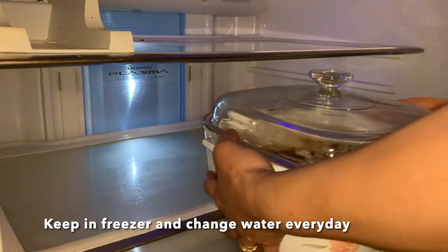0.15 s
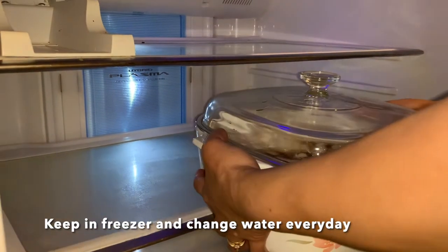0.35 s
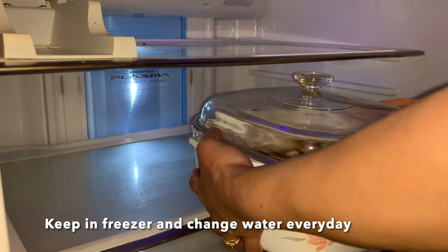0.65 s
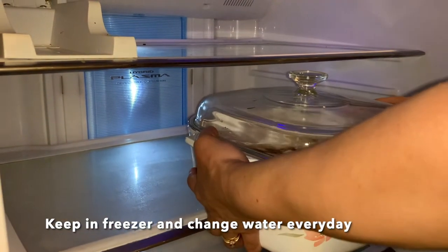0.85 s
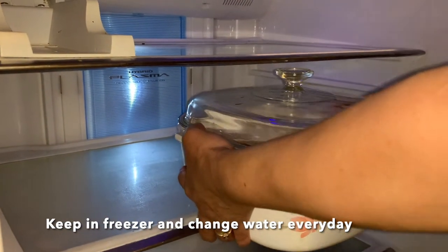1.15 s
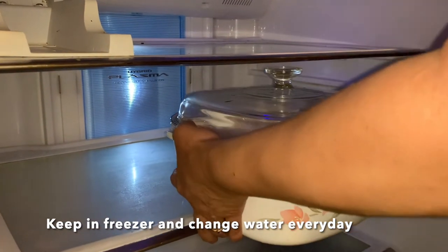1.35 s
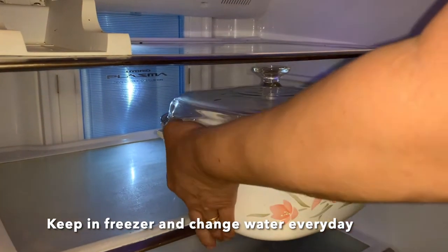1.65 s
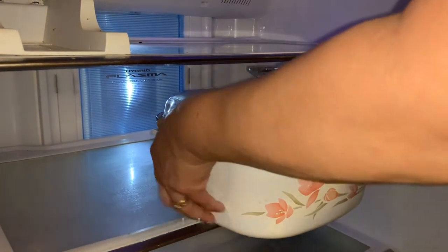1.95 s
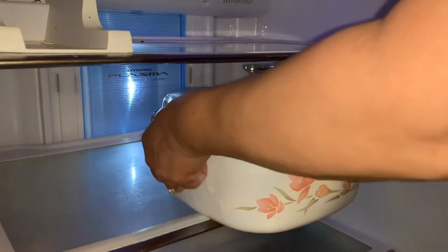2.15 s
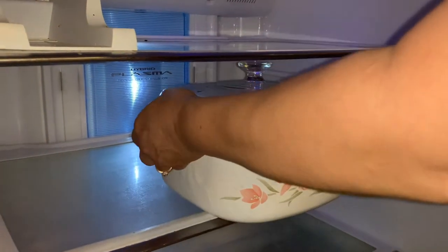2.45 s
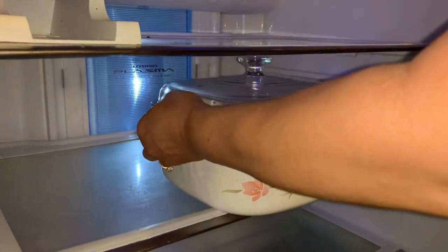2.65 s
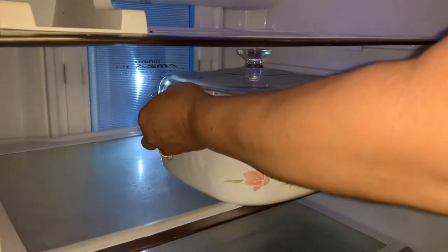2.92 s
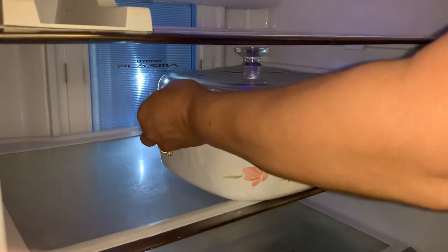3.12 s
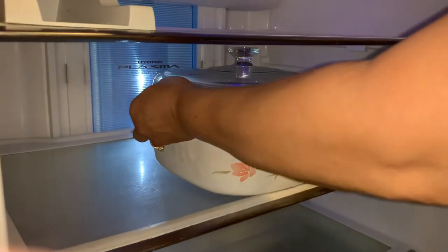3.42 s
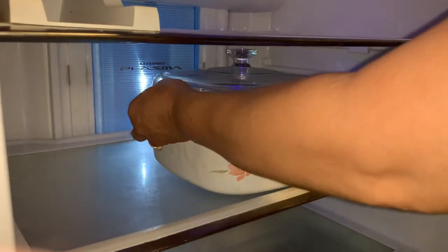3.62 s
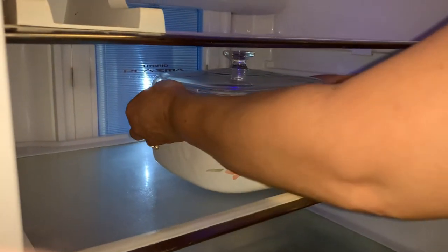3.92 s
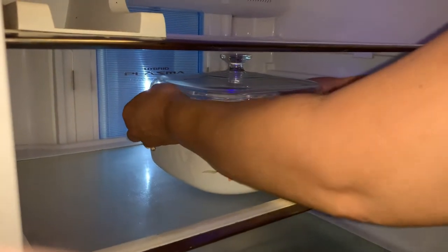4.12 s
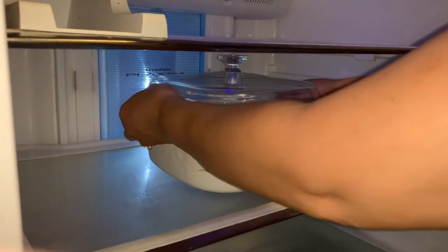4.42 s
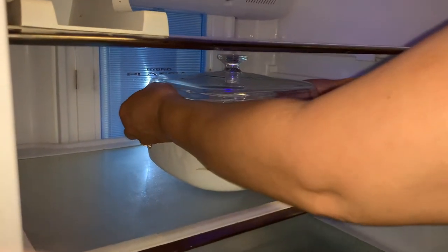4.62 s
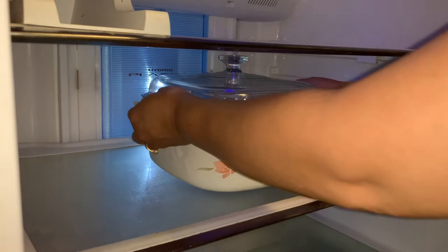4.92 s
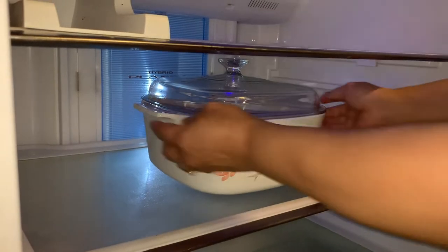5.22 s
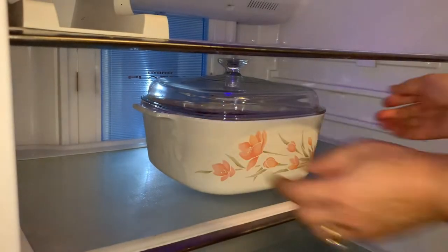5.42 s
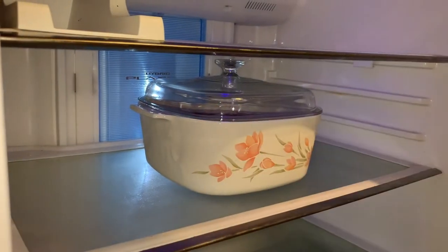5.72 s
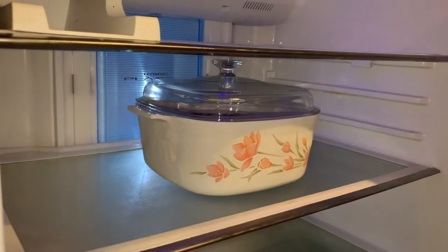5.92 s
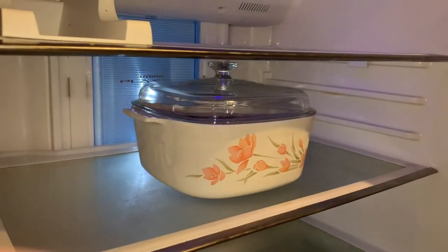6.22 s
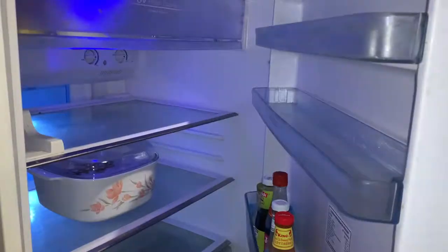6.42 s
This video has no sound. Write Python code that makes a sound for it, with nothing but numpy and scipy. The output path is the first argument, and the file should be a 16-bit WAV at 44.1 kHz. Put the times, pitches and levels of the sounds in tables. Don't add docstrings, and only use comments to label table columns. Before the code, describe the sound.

A nearby phone microphone picks up a loaded ceramic dish being pushed onto a glass fridge shelf: gritty jerky grinding, a low thump and creak, two hollow knocks, and a quick bouncing clatter from the glass lid. Tiny ticks and dry finger brushing fill the gaps over soft compressor hum and fan air, ending duller outside the door.

```python
import sys
import numpy as np
from scipy import signal
from scipy.fft import rfft, irfft, next_fast_len
from scipy.io import wavfile
from scipy.ndimage import uniform_filter1d, map_coordinates

SR = 44100
rng = np.random.default_rng(int(sys.argv[2]) if len(sys.argv) > 2 else 0)


def unload_audio(sound):
    columns = np.transpose(np.atleast_2d(sound))
    steps = np.round(np.clip(columns, -1, 1) * 32767)
    wavfile.write(sys.argv[1], SR, steps.astype(np.int16))


def voltage_ratio(level):
    return 10 ** (np.asarray(level, float) / 20)


N = 289296


def unit(x):
    return x / np.sqrt(np.mean(x ** 2) + 1e-20)


def along(points, hz):
    f, v = np.transpose(points)
    return np.interp(np.log(hz + 1), np.log(f + 1), v)


def coloured(x, points):
    m = next_fast_len(x.shape[-1] + 4096)
    gain = voltage_ratio(along(points, np.fft.rfftfreq(m, 1 / SR)))
    return irfft(rfft(x, m) * gain, m)[..., :x.shape[-1]]


def wobble(rate):
    knots = rng.standard_normal(int(N * rate / SR) + 4)
    return map_coordinates(knots, [np.arange(N) * rate / SR], order=1)


def patchy(depth_db):
    z = signal.stft(rng.standard_normal(N), nperseg=256)[2]
    field = uniform_filter1d(rng.standard_normal(z.shape), size=2, axis=0)
    field = uniform_filter1d(field, size=16, axis=1)
    return signal.istft(z * voltage_ratio(depth_db * unit(field)), nperseg=256)[1][:N]


def grains(spiky_db):
    return patchy(depth_db=3.5) * voltage_ratio(spiky_db * wobble(700) + .6 * spiky_db * wobble(60))


def narrow(length, width_hz):
    size = max(int(SR / width_hz), 2)
    z = rng.standard_normal((2, length))
    z = uniform_filter1d(uniform_filter1d(z, size, axis=1), size, axis=1)
    return (z[0] + 1j * z[1]) * np.sqrt(1.2 * size)


def smeared_tone(t, hz, steady, smear, width_hz):
    return np.imag((steady + smear * narrow(len(t), width_hz)) * np.exp(2j * np.pi * hz * t))


def stroke(start_s, length_s, rise_s, fade_s, sag_db=0):
    t = np.maximum(np.arange(N) / SR - start_s, 0)
    rise = np.minimum(t / rise_s, 1) ** 2
    fade = np.minimum(np.maximum(t - length_s, 0) / fade_s, 3)
    return rise * voltage_ratio(-sag_db * np.minimum(t, length_s) - 60 * fade)


def add(track, s, sound):
    part = track[round(s * SR):][:len(sound)]
    part += sound[:len(part)]


# pitch_hz, side_minus_mid_db
SIDE_WIDTH = [(60, -21.5), (180, -12), (550, -4), (1650, -0.5), (4970, 0.5), (15000, -2)]


def spread(x, pan_db, wide_db):
    m = next_fast_len(N + 8192)
    echoes = rng.standard_normal(256) * voltage_ratio(-60 * np.arange(256) / SR / .008)
    tail = rng.standard_normal(4096) * voltage_ratio(-60 * np.arange(4096) / SR / .1)
    walls = rfft(echoes / np.linalg.norm(echoes), m)
    diffuse = rfft(tail / np.linalg.norm(tail), m)
    width = voltage_ratio(along(SIDE_WIDTH, np.fft.rfftfreq(m, 1 / SR)) + wide_db)
    side = irfft(rfft(x, m) * (1.2j * walls.imag + 0.61 * diffuse) * width, m)[:N]
    kitchen = coloured(rng.standard_normal(8192), [(3000, -0.5), (9000, -10.0)])
    kitchen *= voltage_ratio(-60 * np.arange(8192) / SR / 0.24)
    mid = x + voltage_ratio(-14) * signal.fftconvolve(x, kitchen / np.linalg.norm(kitchen))[:N]
    return np.array([mid + side, mid - side]) * voltage_ratio([[pan_db / 2], [-pan_db / 2]])


# start_s, length_s, pressure_db, weight_on_shelf_db, grit_db
PUSHES = [
    [(.056, 0.022, -39, 7, -8.5), (.142, 0.051, -41, 3.5, -14), (.185, 0.023, -44, 8, -3),
     (.262, 0.041, -44, 7.5, -10)],
    [(1.436, 0.063, -48, -6, -14.5), (1.49, 0.018, -49, 9.5, -34), (1.6, 0.17, -67.5, -9, -13)],
    [(3.394, 0.012, -76.5, 16, 23.5), (3.472, 0.02, -77, 18, 11)],
    [(6.246, 0.04, -68.5, 6.5, 0), (6.3, 0.031, -68, -5, -19)],
]
# pitch_hz, level_db
GRIT_TONES = [
    [(940, -15.5), (1600, -3.5), (3770, -6), (4920, -11.5), (8300, -18.5), (11900, -17), (13700, -16),
     (15600, -51.5)],
    [(940, -34), (1800, 2.5), (2360, -12.5), (3300, -0.5), (5260, -17.5), (11600, -37), (13100, -29),
     (15600, -25)],
    [(940, -27), (3300, -12.5), (3990, -3.5), (5160, -18), (10100, -17), (11500, -33), (13100, -14.5),
     (15600, -58)],
    [(940, -37.5), (1600, -17), (4690, 3), (6120, -21), (11400, -13), (12100, -21), (13400, -16),
     (15600, -64)],
]
# pitch_hz, level_db
SHELF_BOOM = [(18, -63.5), (33, -28), (75, -7), (275, -1), (479, -19), (600, -18), (780, -47), (1320, -120)]
# pitch_hz, level_db
DISH_BODY = [(180, -9), (300, -2), (480, -9.5), (544, -2.5), (605, -11.5), (893, -3.5), (2500, -42.5),
             (5500, -120)]
# shelf_s, dish_s, grit_s
PUSH_RISE = (0.019, 0.018, 0.012)
# shelf_s, dish_s, grit_s
PUSH_FADE = (0.35, .14, .15)


def drags():
    out = np.zeros((2, N))
    for pushes, grit_tone, pan_db in zip(PUSHES, GRIT_TONES, (-0.89, -0.89, .9, -0.64)):
        layers = np.zeros((3, N))
        for start_s, length_s, db, weight_db, grit_db in pushes:
            levels = (db + weight_db, db, db + grit_db)
            for layer, level_db, rise_s, fade_s in zip(layers, levels, PUSH_RISE, PUSH_FADE):
                layer += voltage_ratio(level_db) * stroke(start_s, length_s, rise_s, fade_s)
        boom, body, hiss = layers
        shelf = boom * unit(coloured(rng.standard_normal(N) * voltage_ratio(5.9 * wobble(90)), SHELF_BOOM))
        dish = body * unit(coloured(grains(spiky_db=4.0), DISH_BODY))
        sand = unit(coloured(grains(spiky_db=-0.5), grit_tone))
        top = coloured(sand, [(8500, -80), (9300, 0)])
        pressure = (hiss / hiss.max()) ** 0.57
        grit = hiss * (sand - top + 1.4 * pressure * top)
        out += spread(shelf + dish + grit, pan_db, wide_db=0.5)
    return out


def short_time():
    return np.arange(SR // 5) / SR


def burst(spectrum):
    return unit(coloured(rng.standard_normal(SR // 5), spectrum))


# start_s, peak_db, thud_db, sizzle_db, fade_s
CATCHES = [
    (0.0599, -36, 4, -19.5, 0.22),
    (0.081, -42, 18.5, -15, 0.034),
    (0.1434, -28, 7, -48, 0.13),
    (0.264, -25.5, -8, -16.5, 0.043),
    (0.293, -31.5, -6, -22.5, 0.049),
    (1.4633, -40.5, -4, -19, 0.049),
    (1.4974, -36, 11, -15.5, 0.039),
    (6.3026, -50, -4.5, -37, 0.1),
]
# pitch_hz, level_db
CRACK_TONE = [(290, -32), (500, 1), (1640, -13.5), (4100, -11), (4980, -27), (8170, -25), (11700, -57),
              (19800, -120)]
# pitch_hz, level_db
CRACK_SIZZLE = [(5290, -21), (9000, -5.5), (11900, -7), (13400, -3), (15600, -23.5)]


def catches():
    out, t = np.zeros(N), short_time()
    for start_s, db, thud_db, sizzle_db, fade_s in CATCHES:
        crack = burst(CRACK_TONE) + voltage_ratio(sizzle_db) * burst(CRACK_SIZZLE)
        crack = crack * voltage_ratio(-60 * t / fade_s)
        thud = np.sin(2 * np.pi * rng.uniform(186, 269) * t) * voltage_ratio(thud_db - 60 * t / 0.11)
        add(out, start_s, voltage_ratio(db - 5.0) * (crack + thud) * (1 - np.exp(-t / 0.0012)))
    return out


# start_s, peak_db, pitch_hz, length_s
CREAKS = [
    (1.596, -53.5, 654, 0.036),
    (1.652, -51.5, 661, 0.055),
    (1.679, -44.5, 660, 0.036),
    (1.778, -47, 649, 0.045),
]


def creaks():
    out, t = np.zeros(N), short_time()
    for start_s, db, hz, length_s in CREAKS:
        swell = (t / length_s * 3) ** 2 * np.exp(2 - t / length_s * 6)
        tone = smeared_tone(t, hz, steady=1, smear=0.2, width_hz=190)
        add(out, start_s, voltage_ratio(db - 1.5) * swell * tone)
    return out


# start_s, peak_db, pitch_hz, fade_s
TICKS = [(.04, -46, 5830, 0.039), (.04, -50, 7970, .035), (0.041, -45, 4100, 0.045),
         (.042, -43.5, 2160, 0.037), (.69, -71.5, 4330, 0.094), (1.474, -52, 2800, 0.067),
         (1.601, -62.5, 3530, 0.044), (1.8, -74, 5500, 0.088), (1.645, -71, 3500, 0.043),
         (1.69, -69, 1710, 0.18), (1.71, -69, 5250, .08), (1.72, -65, 1755, .1), (1.812, -68, 3830, 0.092),
         (2.173, -63.5, 4140, 0.13), (2.33, -76.5, 3760, 0.53), (2.573, -64.5, 3130, 0.054),
         (2.646, -69, 3920, 0.13), (2.95, -69, 3180, 0.1), (3.02, -57, 2100, 0.085),
         (3.021, -48, 1660, .06), (3.028, -64.5, 3950, 0.1), (3.046, -70, 5100, .1), (3.06, -67, 4000, .1),
         (3.064, -64, 5130, .06), (3.17, -64.5, 3680, 0.075), (3.298, -60, 5520, .045),
         (3.298, -58, 4050, .04), (3.299, -56.5, 3270, 0.052), (3.299, -63, 6500, 0.034),
         (3.4, -62, 3000, 0.087), (3.401, -55, 3500, .25), (3.402, -66, 5490, .2), (3.402, -63.5, 6520, .2),
         (3.403, -66, 8100, .15), (3.403, -66, 9850, .15), (3.481, -68.5, 3960, .075),
         (3.7, -63.5, 880, 0.086), (4.573, -61, 1700, 0.09), (4.573, -68, 1400, 0.075),
         (4.762, -70, 2200, 0.042), (4.777, -75, 4500, 0.051), (4.779, -75.5, 8500, .05),
         (5.223, -69, 8800, .04), (5.224, -63, 6800, 0.041), (5.224, -59.5, 3720, 0.05),
         (5.656, -59, 2020, 0.054), (6.135, -67, 8560, 0.037)]


def ticks():
    out, t = np.zeros(N), short_time()
    for start_s, db, hz, fade_s in TICKS:
        ring = smeared_tone(t, hz, steady=1.0, smear=0.74, width_hz=700)
        envelope = voltage_ratio(db - 60 * t / fade_s) * (1 - np.exp(-t / 0.0062))
        add(out, start_s, envelope * (ring + voltage_ratio(-8) * burst(CRACK_TONE)))
    return out


# start_s, peak_db, pitch_hz
CABINET_BUMPS = [(0.105, -38, 242), (0.152, -27, 270), (0.31, -33, 232), (0.389, -35, 127),
                 (0.437, -40, 141), (0.699, -44, 153), (1.502, -33, 327), (1.521, -25.5, 162.5),
                 (1.549, -31, 199), (2.985, -35.5, 267.6), (3.009, -38.5, 328), (3.041, -37.5, 154),
                 (3.062, -42, 169.8), (3.108, -48, 200), (3.535, -40, 259.6), (3.563, -36.5, 210),
                 (3.585, -40, 239.8), (6.391, -46, 153), (6.506, -42.5, 178)]
# start_s, peak_db, pitch_hz
SHELF_RINGS = [
    (3.0, -50, 89),
    (3.525, -34, 157.7),
]


def bumps():
    out, t = np.zeros(N), short_time()
    for events, fade_s in ((CABINET_BUMPS, 0.06), (SHELF_RINGS, 0.28)):
        for start_s, db, hz in events:
            envelope = voltage_ratio(db + 2.5 - 60 * t / fade_s) * (1 - np.exp(-t / 0.0037))
            add(out, start_s, envelope * np.sin(2 * np.pi * hz * t))
    return out


def contacts():
    return spread(catches() + creaks() + ticks() + bumps(), pan_db=-2.3, wide_db=1.0)


# pitch_hz, fade_s
CLATTER_FADE = [(100, 0.49), (500, 0.13), (2000, 0.11), (6000, 0.054), (14000, 0.056)]


def knock(blows, modes, spectrum, ring_db, crack_db, noise_db, damping, smear, loss, build, held=9):
    out, t = np.zeros(N), np.arange(SR // 3) / SR
    for start_s, db in blows:
        ring = np.zeros(len(t))
        for hz, level_db, fade_s in modes:
            strength_db = level_db + rng.normal(0, 2.1)
            hands_db = 420 * np.maximum(t + start_s - held, 0) / (1 + (hz / 2200) ** 2)
            decay_db = 60 * t * (damping / min(fade_s, .45) + loss * hz / 1000)
            rise = (1 - np.exp(-t * hz / build)) ** 2
            tone = smeared_tone(t, hz, steady=1, smear=smear, width_hz=120)
            ring += voltage_ratio(strength_db - hands_db - decay_db) * rise * tone
        crack = unit(coloured(rng.standard_normal(len(t)), spectrum))
        crack = coloured(crack, [(250, -18), (600, 0)]) * voltage_ratio(-60 * t / 0.038)
        hz, frames, z = signal.stft(rng.standard_normal(len(t)), SR, nperseg=256)
        dying = voltage_ratio(-60 * frames / along(CLATTER_FADE, hz)[:, None])
        building = 1 - np.exp(-frames * (hz[:, None] + 60) / (2.7 * build))
        clatter = signal.istft(z * dying * building, SR, nperseg=256)[1][:len(t)]
        clatter = coloured(clatter, spectrum)
        clatter /= np.std(clatter[200:800])
        mix = voltage_ratio(ring_db) * ring + voltage_ratio(crack_db) * crack + voltage_ratio(noise_db) * clatter
        add(out, start_s, voltage_ratio(db) * mix * (1 - np.exp(-t / 0.0017)))
    return out


# start_s, peak_db
FIRST_BLOWS = [
    (2.97, -27.5),
]
# pitch_hz, level_db, fade_s
FIRST_RINGING = [(275, -33, 0.22), (534, -7.5, 0.14), (989, 4.5, 0.075), (1660, 2.5, 0.06),
                 (1833, -28, 0.22), (2470, -6.5, 0.11), (3290, -9, 0.1), (3890, -18, 0.14),
                 (4048, -28, 0.22), (4160, -42.5, 0.1)]
# pitch_hz, level_db
FIRST_CLATTER = [(180, -40), (300, -8), (977, -4), (1680, -13), (2470, -13.5), (5000, -25), (5600, -44),
                 (19800, -120)]


def first_knock():
    sound = knock(FIRST_BLOWS, FIRST_RINGING, FIRST_CLATTER, ring_db=-6.0, crack_db=-5.5, noise_db=-16.5,
                  damping=1.33, smear=0.34, loss=2.7, build=1.2)
    return spread(sound, pan_db=-0.5, wide_db=1.0)


# start_s, peak_db
SECOND_BLOWS = [
    (3.505, -45.5),
    (3.511, -21),
    (3.521, -38.5),
]
# pitch_hz, level_db, fade_s
SECOND_RINGING = [(105.8, -1, 0.45), (199, -2.5, 0.31), (393, -9.5, 0.26), (632, -5.5, 0.089),
                  (780, 5, 0.075), (878, -6, 0.2), (1130, -6.5, 0.08), (1233, 0.5, 0.09), (1405, -1, 0.055),
                  (1577, -20.5, 0.33), (1860, -1, 0.07), (2270, -10, 0.12), (2770, -14, .1),
                  (4000, -18, .08)]
# pitch_hz, level_db
SECOND_CLATTER = [(110, -34), (220, -5.5), (600, -14), (2540, -20), (4490, -26.5), (5860, -44),
                  (13200, -56), (14200, -79.5)]


def second_knock():
    sound = knock(SECOND_BLOWS, SECOND_RINGING, SECOND_CLATTER, ring_db=-11.5, crack_db=-5, noise_db=-15,
                  damping=0.9, smear=.3, loss=1.5, build=1.1)
    return spread(sound, pan_db=0.1, wide_db=1.5)


# start_s, peak_db
LID_BLOWS = [
    (4.827, -49.5),
    (4.8315, -24.5),
    (4.842, -29.5),
    (4.858, -34.5),
    (4.882, -33.5),
    (4.912, -39.5),
    (4.93, -43),
]
# pitch_hz, level_db, fade_s
LID_RINGING = [(256, -1.5, 0.14), (794.6, -2, 0.36), (870, 0, 0.27), (1224, -0.5, 0.23), (1273, -11, 0.62),
               (1675, -1.5, 0.45), (2300, -14, 0.45), (2850, -7.5, 0.55), (3230, -15, 0.22),
               (3910, -18, 0.36), (4284, -7, 0.24), (6040, -24, 0.12), (6520, -20, 0.06), (8210, -21, 0.05)]
# pitch_hz, level_db
LID_CLATTER = [(90, -23), (200, 0), (390, -10.5), (819, -2), (1700, -10), (4750, -22.5), (5400, -44.5),
               (9200, -52), (9800, -88.5)]
# start_s, peak_db
RIM_BLOWS = [
    (4.832, -78.5),
    (4.843, -68),
]
# pitch_hz, level_db, fade_s
RIM_RINGING = [(7704, 4.5, 0.094), (8802, 1, .08), (9190, -3, 0.091), (9870, -16, .06), (10800, -6, .07),
               (12350, -8, .025), (13200, -11, .025), (13610, -5.5, .08)]


def lid_rattle():
    lid = knock(LID_BLOWS, LID_RINGING, LID_CLATTER, ring_db=-13, crack_db=-8.5, noise_db=-10.5,
                damping=1.21, smear=0.48, loss=0.15, build=0.32, held=4.945)
    rim = knock(RIM_BLOWS, RIM_RINGING, LID_CLATTER, ring_db=-0.5, crack_db=-39, noise_db=-39.5,
                damping=1, smear=.2, loss=0, build=3)
    return spread(lid + rim, pan_db=-1.0, wide_db=1.0)


# start_s, peak_db
TAP_BLOWS = [
    (5.375, -69),
    (5.385, -45.5),
]
# pitch_hz, level_db
TAP_TONE = [(880, -53), (1500, -16), (2510, -1.5), (2980, -14), (3340, -2), (4450, 3), (7600, -10),
            (16700, -120)]


def ring_tap():
    sound = knock(TAP_BLOWS, [], TAP_TONE, ring_db=0, crack_db=-2.0, noise_db=-18.0,
                  damping=1, smear=0, loss=0, build=.3)
    return spread(sound, pan_db=-3.5, wide_db=2.5)


# start_s, length_s, pitch_hz, level_db
SQUEAKS = [
    (2.035, 0.05, 13200, -85.5),
    (2.026, 0.042, 6330, -97),
    (2.071, 0.07, 9850, -89.5),
    (2.146, 0.12, 13900, -79),
    (2.147, 0.11, 12240, -77),
    (2.156, 0.16, 10840, -94),
    (2.163, 0.037, 5720, -84),
    (2.36, 0.031, 13800, -93),
    (5.318, 0.056, 6530, -80),
]


def squeaks():
    out = np.zeros(N)
    for start_s, length_s, hz, db in SQUEAKS:
        u = np.linspace(0, 1, round(length_s * SR))
        phase = 2 * np.pi * np.cumsum(hz * (1 - 0.062 * (u - .45) ** 2)) / SR
        rough = 0.94 + 1.0 * narrow(len(u), width_hz=370)
        add(out, start_s, voltage_ratio(db + 7.0) * np.sin(np.pi * u) ** 0.75 * np.imag(rough * np.exp(1j * phase)))
    return out


# start_s, length_s, level_db, fade_s
BRUSHES = [
    [(5.3, 0.16, -63.5, 0.25), (5.5, 0.11, -73.5, 1.3)],
    [(5.515, 0.3, -61.5, 0.2), (5.9, 0.25, -94, 0.37)],
    [(5.33, 0.098, -74, 0.38), (5.51, 0.13, -76, 0.64)],
]
# pitch_hz, level_db
FINGERTIP_HISS = [(4120, -47), (7480, -14), (8670, 9), (9300, -5), (9940, -39), (12300, -6), (13500, -13),
                  (15000, -71)]
# pitch_hz, level_db
SKIN_HISS = [(6760, -59), (11500, -19), (11800, -30.5), (12600, 6), (14500, 5), (14900, -16), (15500, -8)]
# pitch_hz, level_db
SLEEVE_RUSTLE = [(880, -27), (1500, -24), (3930, 4), (5500, -16), (6130, 2.5), (7500, -32), (9750, -49),
                 (16500, -120)]


def brushes():
    out = np.zeros(N)
    for moves, spectrum in zip(BRUSHES, (FINGERTIP_HISS, SKIN_HISS, SLEEVE_RUSTLE)):
        strength = np.zeros(N)
        for start_s, length_s, db, fade_s in moves:
            strength += voltage_ratio(db) * stroke(start_s, length_s, rise_s=0.034, fade_s=fade_s, sag_db=18)
        out += strength * unit(coloured(patchy(depth_db=5.0), spectrum))
    return out


def fingers():
    return spread(squeaks() + brushes(), pan_db=-4.0, wide_db=0.5)


# time_s, level_db
FAN_LEVEL = [(0, -70.5), (.47, -71), (.93, -79), (1.48, -79), (1.64, -70.5), (2.02, -79), (2.1, -72.5),
             (2.34, -69.5), (2.79, -74), (3.44, -71), (3.6, -67), (4.1, -76.5), (4.75, -79), (4.97, -73.5),
             (5.3, -74.5), (5.59, -68), (6.16, -71.5), (6.33, -77.5)]
# pitch_hz, level_db
HUM_TONE = [(15, -59.5), (30, -32), (46, -16.5), (70, -17), (155, -6.5), (243, -9.5), (316, -19),
            (600, -30), (1540, -120)]
# pitch_hz, level_db
AIR_TONE = [(240, -30.5), (400, -3.5), (1170, -9.5), (1790, -15.5), (4170, -24.5), (8300, -33.5),
            (13600, -41.5), (15600, -49.5)]
# pitch_hz, width_hz, level_db
DUCT_WHINE = [(243, 8, 3), (1212, 25, 8), (4100, 150, 5), (6100, 250, 3), (8100, 200, 5)]
# pitch_hz, likeness (1 = same)
LIKENESS = [(60, 0.98), (240, 0.91), (950, 0.13), (3770, -0.0027), (15000, 0.05)]
# hum_db, air_db
OUTSIDE_LEVELS = (-61.5, -82.5)


def drone():
    hz, t = np.fft.rfftfreq(N, 1 / SR), np.arange(N) / SR
    turn = np.arccos(np.clip(along(LIKENESS, hz), -1, 1)) / 2
    mid_side = np.array([np.cos(turn), np.sin(turn)])
    lift = 1 + sum(voltage_ratio(db) / (1 + (2 * (hz - centre) / width) ** 2) for centre, width, db in DUCT_WHINE)
    air_db = np.interp(t, *np.transpose(FAN_LEVEL))
    hum_db = air_db.mean() + 10.5 + 0.67 * (air_db - air_db.mean())
    out = np.zeros((2, N))
    parts = zip((hum_db, air_db), OUTSIDE_LEVELS, (HUM_TONE, AIR_TONE), (2.2, 1.2))
    for inside_db, outside_db, spectrum, flutter_db in parts:
        noise = rfft(rng.standard_normal((2, N)))
        mid, side = irfft(noise * voltage_ratio(along(spectrum, hz)) * lift * mid_side, N)
        level_db = np.where(t < SCENE_GAP[1] - .015, inside_db, outside_db) + flutter_db * wobble(11)
        out += voltage_ratio(level_db) * unit(np.array([mid + side, mid - side]))
    return out


# start_s, end_s
SCENE_GAP = (6.338, 6.368)


def scene():
    t = np.arange(N) / SR
    start_s, end_s = SCENE_GAP
    gate = np.clip(np.maximum((start_s - t) / 0.0044, (t - end_s + 0.0078) / 0.013), .02, 1)
    knocks = first_knock() + second_knock() + lid_rattle() + ring_tap()
    return gate * (drags() * (t < end_s) + contacts() + knocks + fingers() + drone())


def top_cut(x):
    return signal.sosfilt(signal.butter(12, 15710, fs=SR, output="sos"), x)


# pitch_hz, level_db
PHONE_BAND = [(20, -16), (45, -6), (80, 0), (11000, 0), (11750, -9), (12300, 0), (15700, 0), (15760, -70)]


def record(dry):
    finished = coloured(dry, PHONE_BAND)
    return top_cut(finished)


dry = scene()
out = record(dry)
unload_audio(out)
```